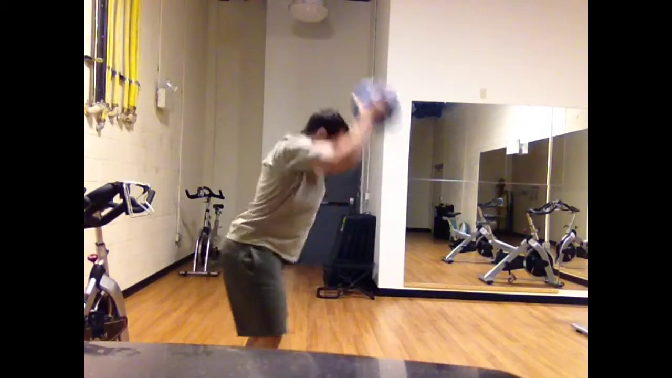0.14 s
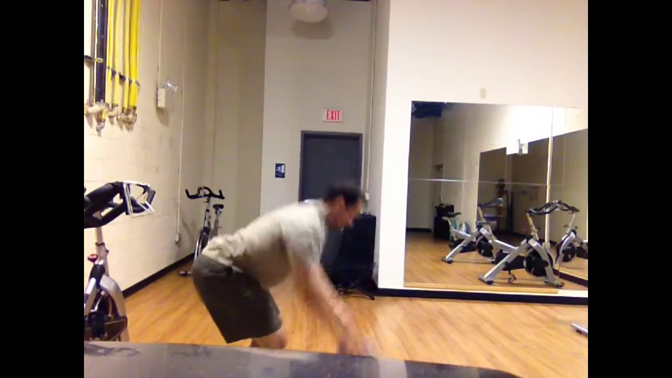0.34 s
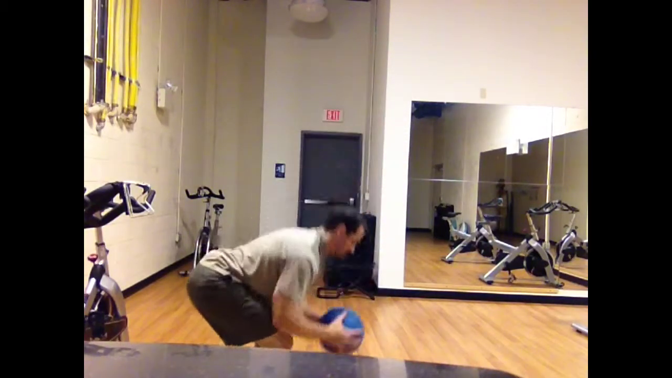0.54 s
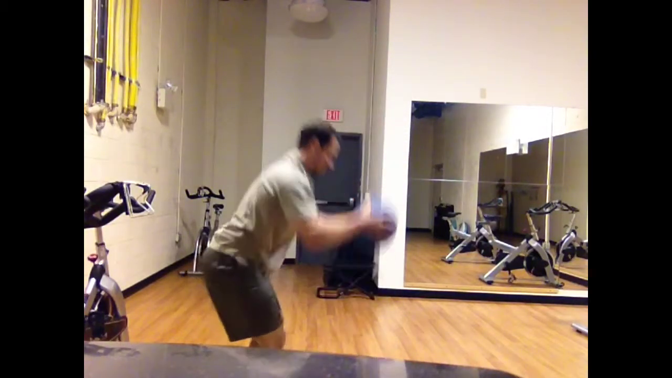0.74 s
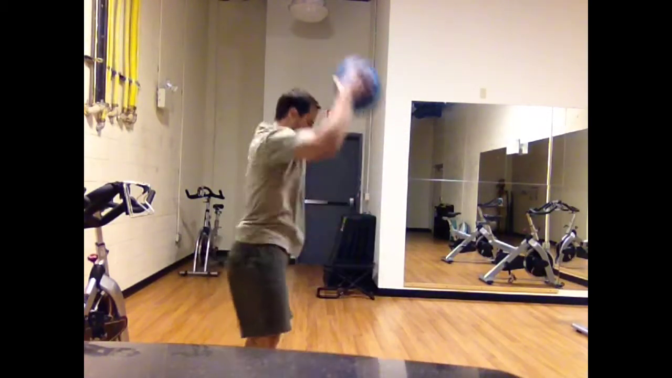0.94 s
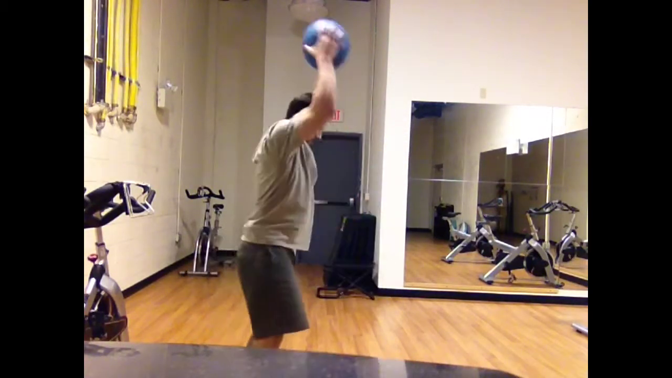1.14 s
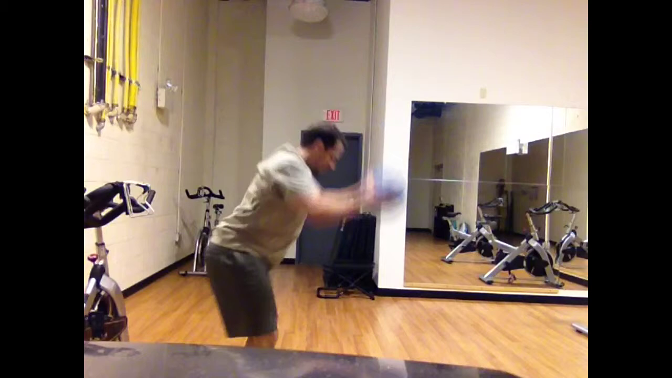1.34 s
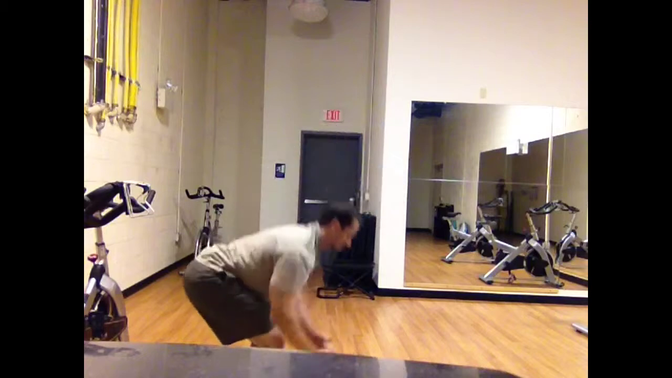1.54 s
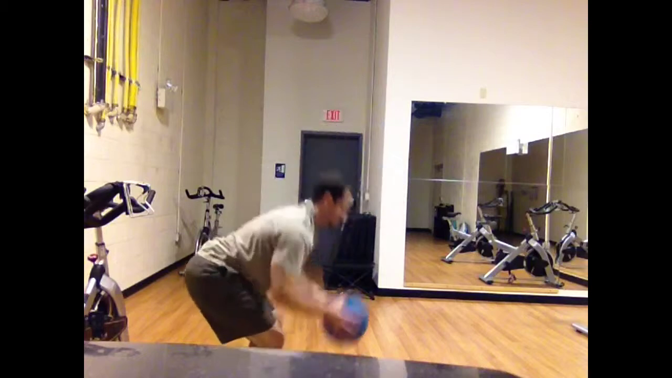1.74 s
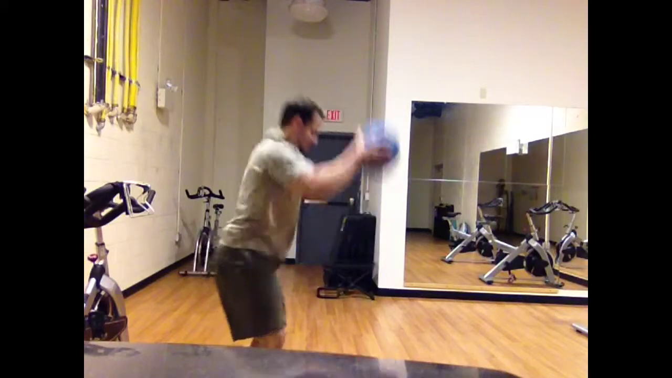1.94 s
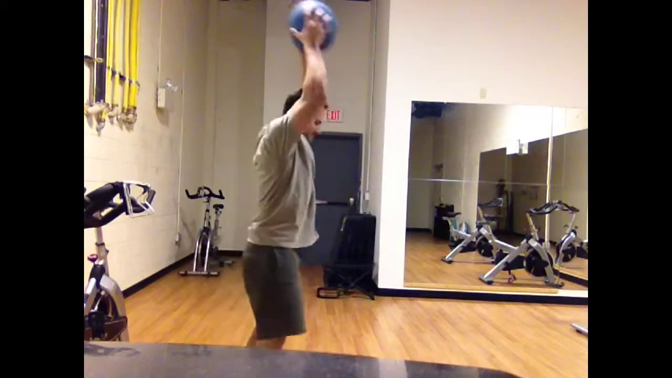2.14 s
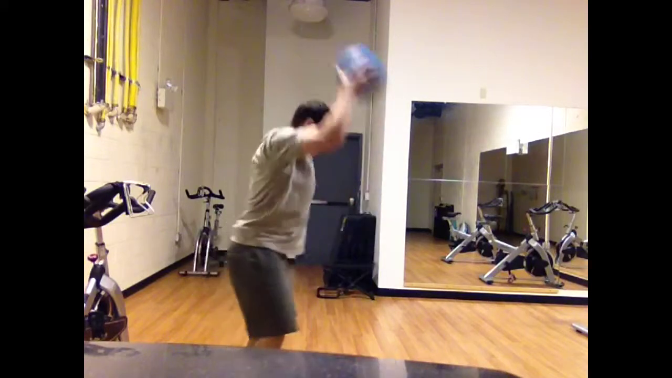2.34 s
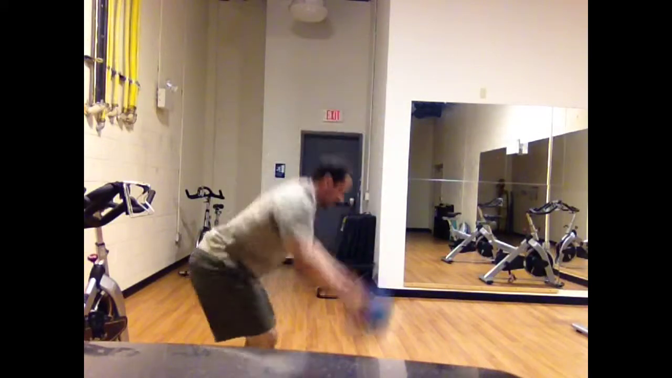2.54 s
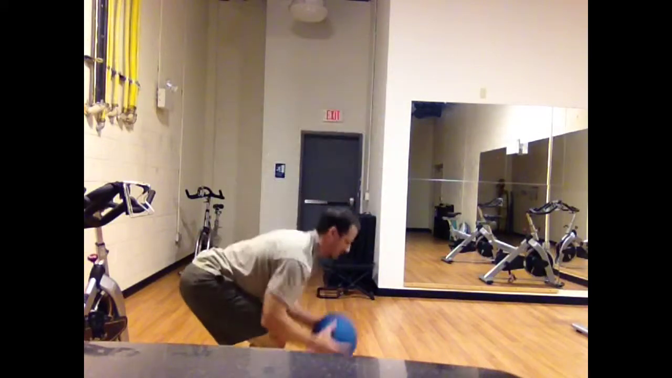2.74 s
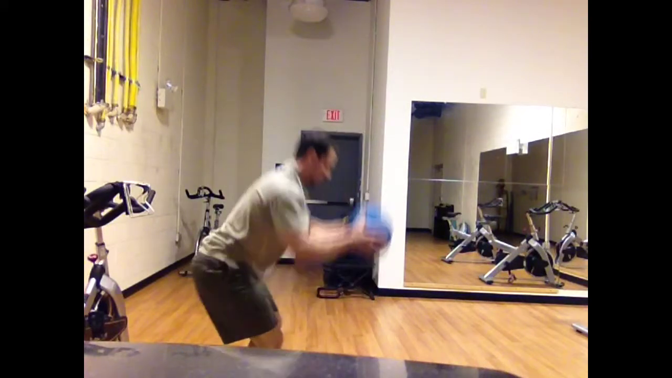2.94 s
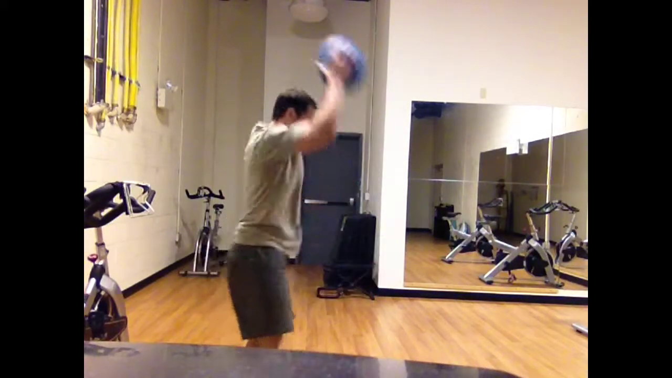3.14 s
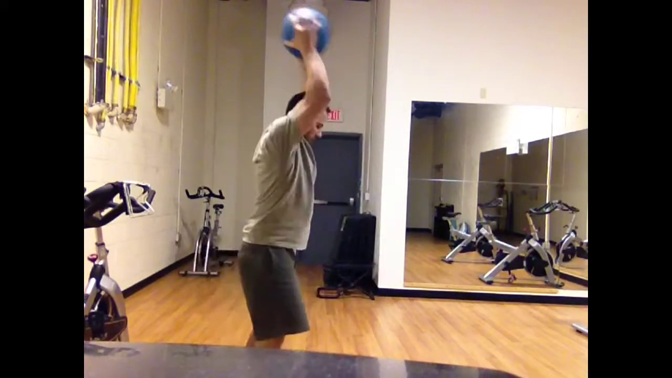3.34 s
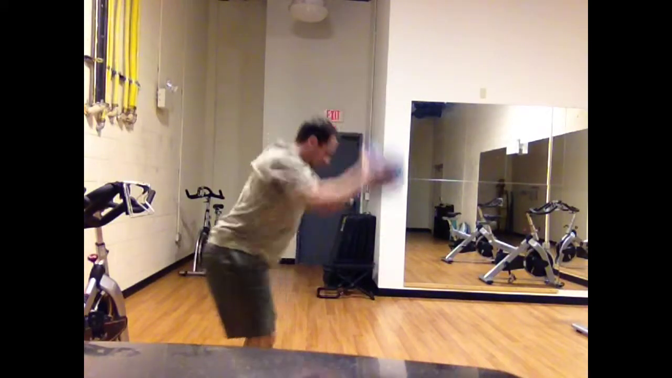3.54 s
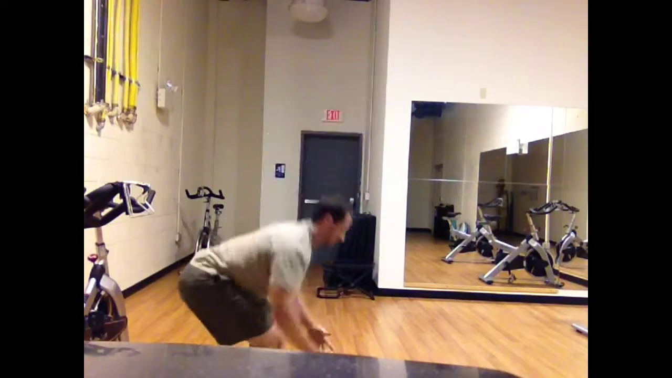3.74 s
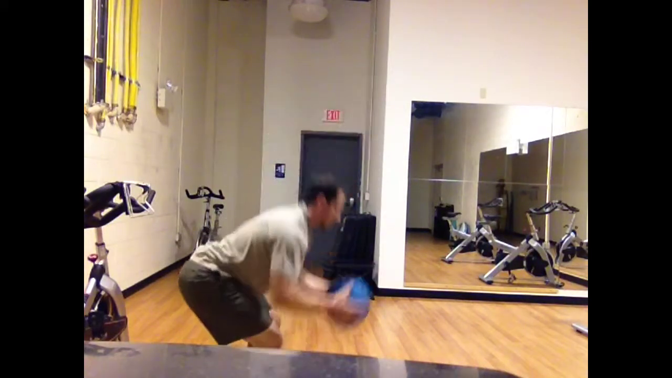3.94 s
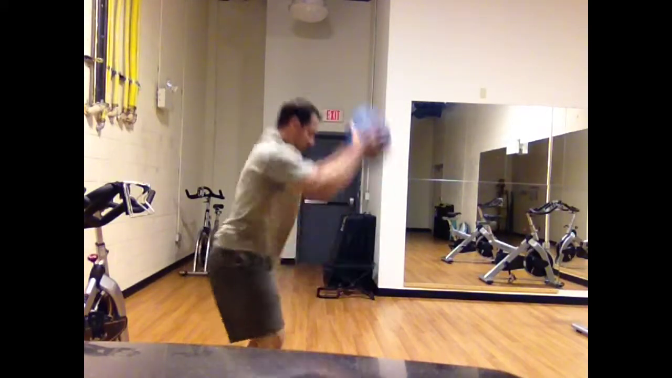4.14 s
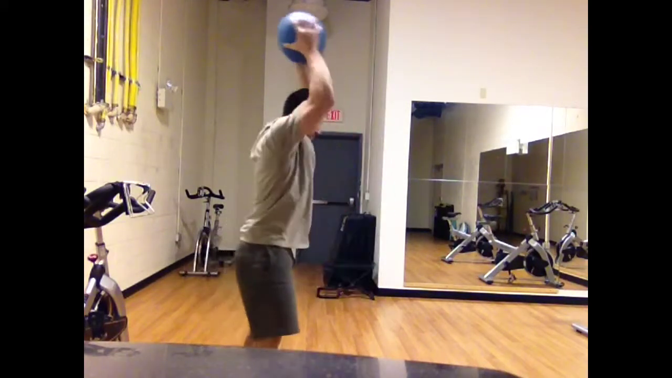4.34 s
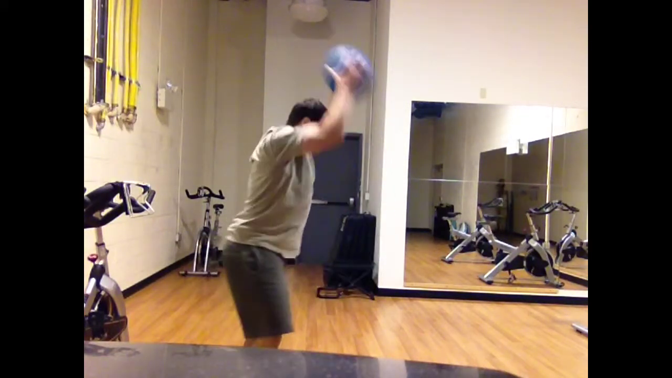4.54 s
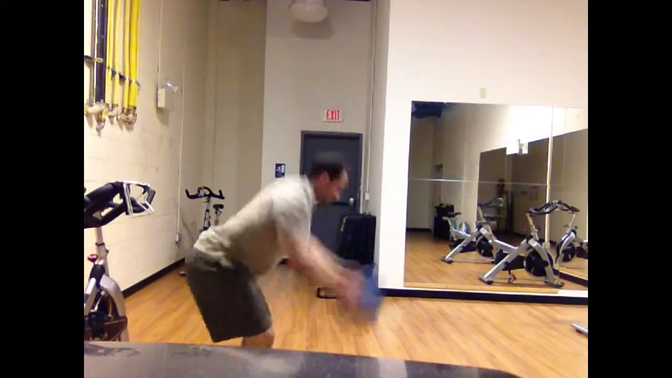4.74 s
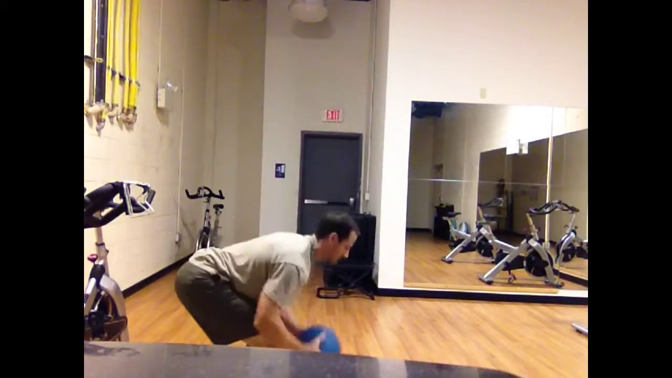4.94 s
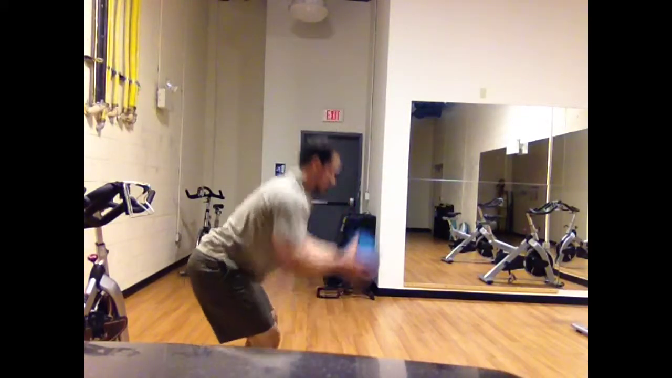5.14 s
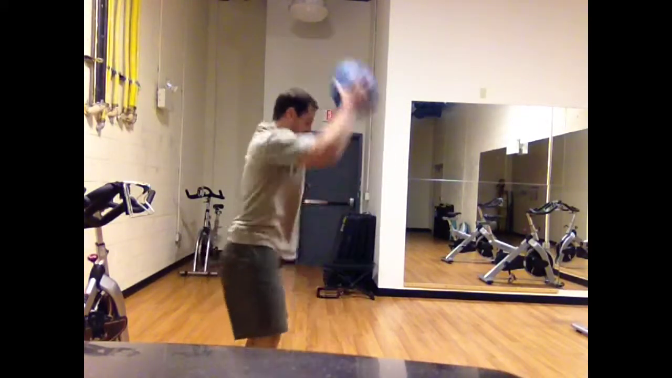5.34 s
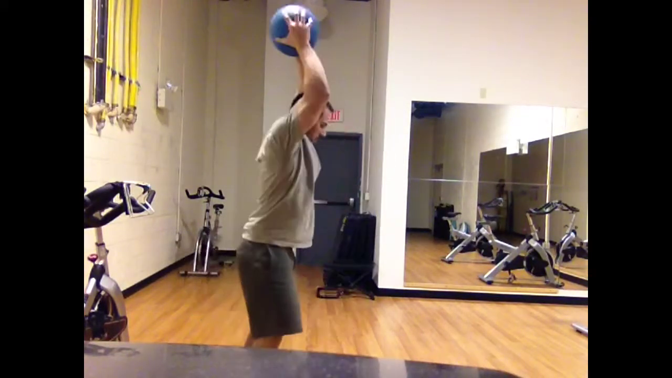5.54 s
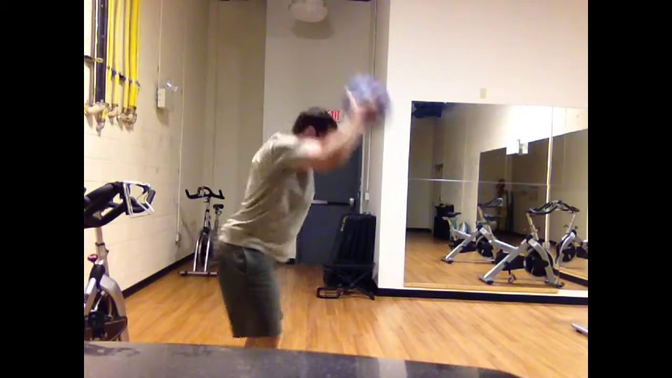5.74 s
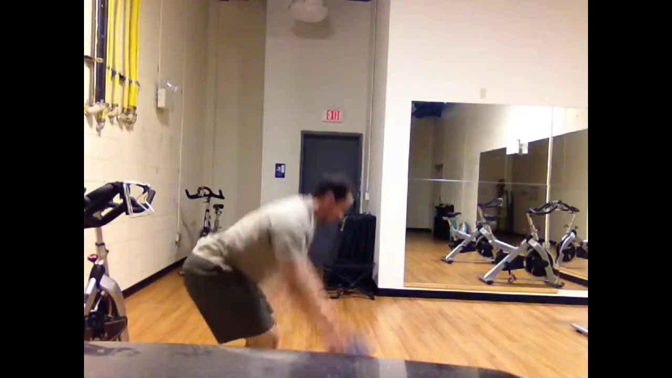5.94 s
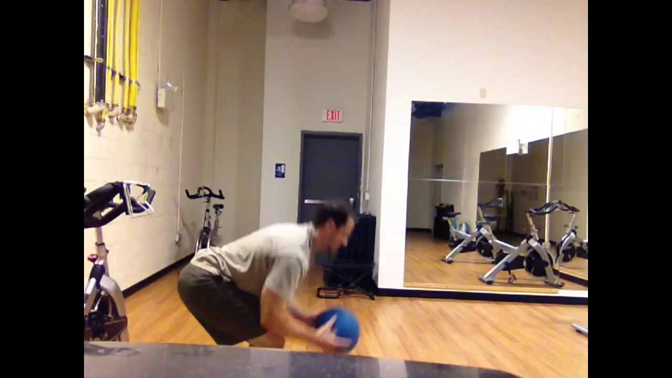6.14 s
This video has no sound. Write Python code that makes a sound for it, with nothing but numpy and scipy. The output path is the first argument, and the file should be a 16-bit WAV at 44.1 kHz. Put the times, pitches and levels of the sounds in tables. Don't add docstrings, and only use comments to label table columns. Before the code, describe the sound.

In a tall, hard-walled gym, a rubber ball is repeatedly slammed onto sprung boards a few steps from the microphone. Six crisp cracks, each squeezing out an extremely brief falling whistle of air, burst into clustered reflections and a ringing tail that overlaps the next. The third is hardest, with the most floor thud. Faint shirt swishes and finger ticks sit above constant duct rumble and lamp buzz.

```python
import sys
import numpy as np
from scipy import signal
from scipy.io import wavfile
from scipy.ndimage import uniform_filter1d

SR = 44100
rng = np.random.default_rng(int(sys.argv[2]) if len(sys.argv) > 2 else 0)


def level_to_linear(level):
    exponent = np.asarray(level, float) / 20
    return 10 ** exponent


def wav_out(sig):
    wavfile.write(sys.argv[1], SR, np.round(np.clip(np.atleast_2d(sig).T, -1, 1) * 32767).astype(np.int16))


N = 272979

# pop in seconds, whistle in dB, whistle's lead on the pop in seconds,
# floor thud in dB, hall tail in dB.
SLAMS = [
    (0.3843, -6.5, 0.00042, -27, -0.56),
    (1.4801, -9.5, 0.0009, -32, -0.07),
    (2.5923, -2, 0.00028, -11.5, -0.23),
    (3.693, -8.5, 0.00085, -20, 0.63),
    (4.8070, -7.5, 0.000045, -34.5, -0.83),
    (5.964, -9.5, 0.00086, -32, 0.16),
]


def evened(x):
    return x / np.sqrt(np.mean(x ** 2) + 1e-20)


def read(points, hz):
    f, value = np.transpose(points)
    return np.interp(np.log(hz + 1), np.log(f + 1), value)


def add(mix, s, sound):
    at = round(s * SR)
    sound = sound[max(-at, 0):]
    part = mix[max(at, 0):][:len(sound)]
    part += sound[:len(part)]


def bump(hz, centre_hz, db, octaves):
    return db * np.exp(-(np.log2(hz / centre_hz + 1e-9) / octaves) ** 2)


def chance(count):
    a, b = rng.standard_normal((count // 256 + 5, 513, 2)).T
    return a + 1j * b


def noise(db_field, z, count):
    hz = np.fft.rfftfreq(1024, 1 / SR)[:, None]
    t = np.arange(z.shape[1]) * 256 / SR
    gain = level_to_linear(db_field(hz, t)) * np.ones(z.shape)
    rms = np.sqrt((gain ** 2).sum(axis=0).mean() * SR / 2048)
    sound = signal.istft(z * gain, nperseg=1024, noverlap=768)[1]
    return rms * evened(sound[:count])


def ventilation():
    # frequency in Hz, level in dB per Hz.
    duct_air = [(50, -106), (120, -82.5), (200, -76.5), (290, -85.5), (1200, -87), (4500, -110),
                (10300, -121), (15200, -119)]
    # frequency in Hz, level in dB.
    whines = [(360, -67), (5160, -94), (5641, -90.5), (5761, -89.5), (6361, -89), (6721, -90.5),
              (6841, -86.5), (14880, -103)]
    t = np.arange(N) / SR
    lines = sum(level_to_linear(db + 2.0) * np.sin(2 * np.pi * (hz * t + rng.random())) for hz, db in whines)
    return noise(lambda hz, s: read(duct_air, hz), chance(N), N) + lines


def lamps():
    # frequency in Hz, level of one line in dB.
    buzz_lines = [(4000, -108), (5300, -99), (6300, -96), (7500, -99), (8400, -103), (9300, -99),
                  (9750, -104), (10100, -116)]
    mains_hz = 60.01
    period = np.arange(round(SR / mains_hz * 8)) / 8
    order = np.arange(66, 250)
    luck = rng.random((len(order), 2))
    uneven_db = 1 - 5 * (order % 2) + 13 * (luck[:, 0] - 0.5)
    height = level_to_linear(read(buzz_lines, order * mains_hz) + uneven_db)
    turns = order[:, None] * period / period.size * 8 + luck[:, 1:]
    cycle = height @ np.sin(2 * np.pi * turns)
    place = np.arange(N) * mains_hz / SR % 1 * period.size
    return cycle[place.astype(int)]


def shirt():
    # frequency in Hz, level in dB per Hz.
    cloth = [(1500, -125), (3000, -108), (7000, -106), (11000, -112), (14500, -109), (16000, -115)]
    # time in seconds, level in dB, width in seconds.
    lift = (3.05, -2.5, .13)
    throw_lead_s, throw_db, throw_s = 0.058, 1.1, 0.105
    t = np.arange(N) / SR
    swishes = [(row[0] - throw_lead_s, throw_db, throw_s) for row in SLAMS] + [lift]
    swing = sum(level_to_linear(db) * np.exp(-(2 * (t - s) / width) ** 2) for s, db, width in swishes)
    grain = level_to_linear(1.2 * evened(uniform_filter1d(rng.standard_normal(N), size=200)))
    return swing * grain * noise(lambda hz, s: read(cloth, hz), chance(N), N)


def hands():
    # start in seconds, peak in dB, pitch in Hz.
    finger_ticks = [
        (.037, -47, 5800),
        (.0495, -53, 5500),
        (0.08, -52, 5200),
        (1.051, -56, 6000),
        (1.076, -53, 6000),
        (2.052, -66, 11500),
        (2.078, -50, 5050),
    ]
    out, t = np.zeros(N), np.arange(600) / SR
    for s, db, hz in finger_ticks:
        flutter = evened(uniform_filter1d(rng.standard_normal(len(t)), size=16))
        swell = 1 - np.exp(-t / 0.0006)
        fade = level_to_linear(db - 4 - 60 * t / 0.029)
        add(out, s, fade * swell * flutter * np.sin(2 * np.pi * hz * t))
    return out


def hall_db(hz, s, brightness):
    # frequency in Hz, time to fall 60 dB in seconds.
    hall_t60 = [(60, 1.2), (250, 1.39), (320, 0.73), (800, 2.07), (1300, 2.25), (3300, 1.332), (6500, 0.68),
                (16000, 0.34)]
    # frequency in Hz, level in dB per Hz.
    hall_colour = [(45, -74.5), (125, -60.5), (250, -56), (800, -45), (1500, -45.5), (1950, -51),
                   (5000, -53.5), (15200, -72.5)]
    colour = read(hall_colour, hz) + brightness * np.log2(hz / 1500 + 0.05)
    panels = bump(hz, 312, -7, 0.16)
    rubber = bump(hz, 4600, 4.5, 0.24)
    fill_db, fill_s, fill_hz = -5.5, 0.12, 9000
    filling = fill_db * np.exp(-s / fill_s) / (1 + (hz / fill_hz) ** 2)
    return colour + panels + rubber + filling - 60 * s / read(hall_t60, hz)


def tail(shared, level_db, brightness):
    near_db, near_s, far_wall_s = 2.1, 0.016, 0.0168
    sparse, dense_s = 0.4, 0.035
    count = 2 * SR
    t = np.arange(count) / SR
    z = 0.81 * shared + 0.62 * chance(count)
    ring = noise(lambda hz, s: hall_db(hz, s, brightness), z, count)
    dull = signal.lfilter(*signal.butter(1, 6000, fs=SR), ring)
    near = dull * level_to_linear(near_db) * np.exp(-t / near_s) * (t < far_wall_s)
    far = ring * (t >= far_wall_s) * (1 - sparse * np.exp(-(t / dense_s) ** 2))
    return level_to_linear(level_db) * (near + far) * (1 - np.exp(-t / 0.00067))


def echoes(whistle, thump, thud):
    # delay in seconds, level in dB, share of the whistle from 0 to 1.
    bounces = [
        (.0028, -6, .8),
        (.0064, -9, 0.2),
        (.009, -14.5, .4),
        (0.0168, -2.9, 0.4),
        (0.0262, -9.5, .1),
        (0.0273, -6, .5),
        (.0284, -7, .3),
        (.0325, -9, .2),
        (.0373, -11, 0.5),
        (0.0486, -11.5, 0.6),
    ]
    out = np.pad(whistle + thump + thud, (0, 3000))
    thin = signal.lfilter(*signal.butter(1, 450, "high", fs=SR), thump)
    for s, db, share in bounces:
        jitter_s = 0.0001 * rng.standard_normal()
        add(out, s + jitter_s, level_to_linear(db) * (share * whistle + thin))
    return out


def slap(whistle_db, lead, thud_db):
    # frequency in Hz, level in dB, time to fall 60 dB in seconds.
    ball_modes = [
        (950, -8.5, 0.014),
        (4330, -8.5, 0.0056),
        (280, -30.5, 0.02),
        (145, -4.5, 0.026),
    ]
    t = np.arange(-88, 3000) / SR
    before, after = np.minimum(t, 0), np.maximum(t, 0)
    turns = 5100 * before + 920000000.0 * before ** 3
    jet = np.exp(-((t + lead) / 0.00038) ** 2) + 0.3 * np.exp(-(before / 0.0012) ** 4)
    ragged = level_to_linear(2.5 * evened(uniform_filter1d(rng.standard_normal(len(t)), size=14)))
    whistle = -np.cos(2 * np.pi * turns) * jet * (t < -0.00008) * np.minimum(ragged, 1.3)
    pop = -1.3 * np.exp(-(t / 0.000064) ** 2) - 0.12 * (t == 0)
    skin, shell, filling, boards = (
        level_to_linear(db - 60 * after / t60) * np.sin(2 * np.pi * hz * after) for hz, db, t60 in ball_modes)
    thump = signal.lfilter(*signal.butter(2, 220, "high", fs=SR), pop + skin)
    return level_to_linear(whistle_db) * whistle + shell, thump, filling + level_to_linear(thud_db) * boards


def slams():
    earlier_slam = (-.72, -4, .0005, -26, -.6)
    blow_db, usual_thud_db = -4.2, -26.5
    brighter = 0.028
    out, shared = np.zeros(N), chance(2 * SR)
    for s, whistle_db, lead, thud_db, tail_db in [earlier_slam, *SLAMS]:
        blow = echoes(*slap(whistle_db, lead, thud_db))
        add(out, s - 88 / SR, level_to_linear(blow_db) * blow)
        add(out, s, tail(shared, tail_db, brighter * (thud_db - usual_thud_db)))
    return out


def scene():
    return (ventilation() + lamps() + shirt() + hands() + slams())[None]


def band_limit(x):
    return signal.sosfilt(signal.butter(12, 16340, fs=SR, output="sos"), x)


def record(dry):
    x = signal.oaconvolve(dry, signal.firwin(1023, 15290, fs=SR)[None], "same")
    x = signal.lfilter(*signal.butter(2, 85, "high", fs=SR), x)
    x = x * np.minimum(np.arange(N) / 150, 1)
    return band_limit(x)


dry = scene()
out = record(dry)
wav_out(out)
```